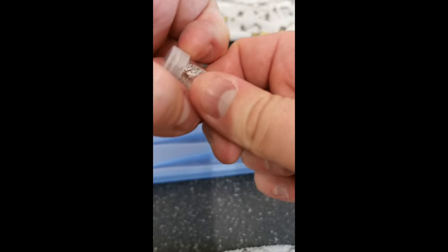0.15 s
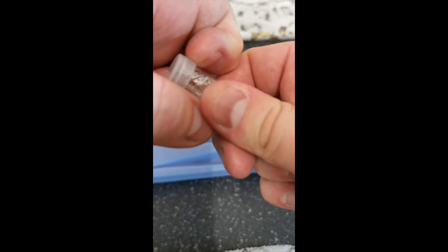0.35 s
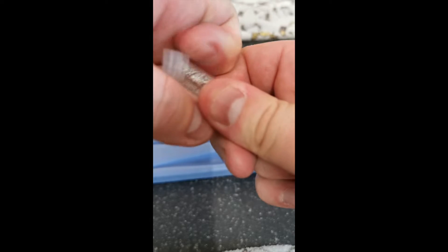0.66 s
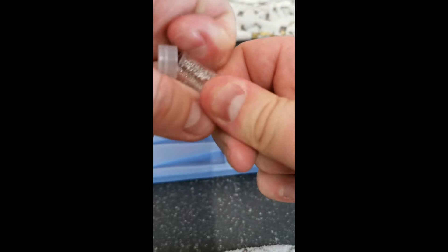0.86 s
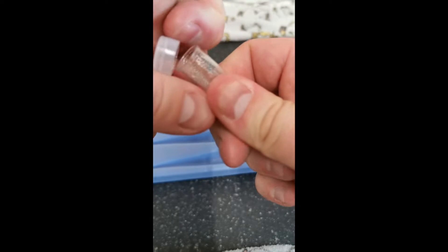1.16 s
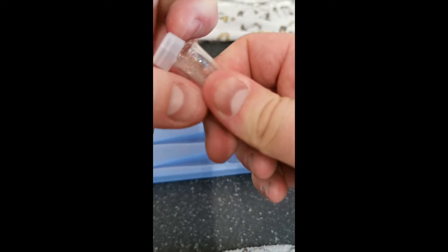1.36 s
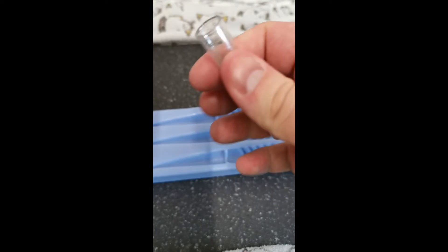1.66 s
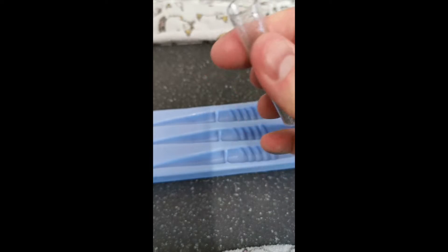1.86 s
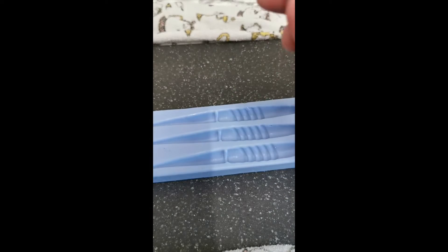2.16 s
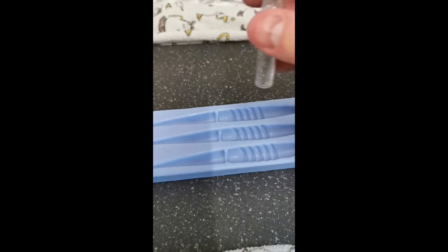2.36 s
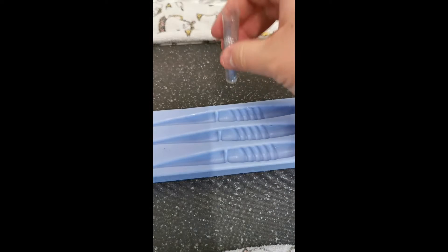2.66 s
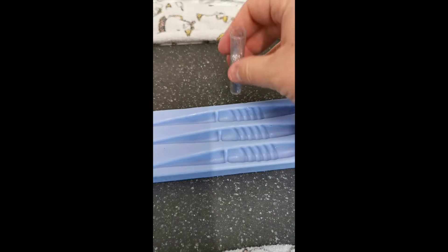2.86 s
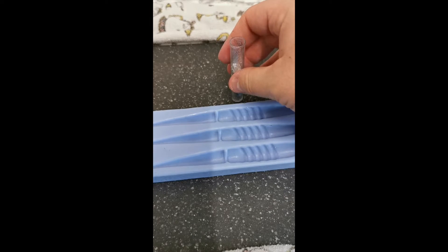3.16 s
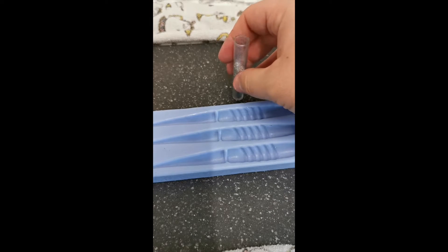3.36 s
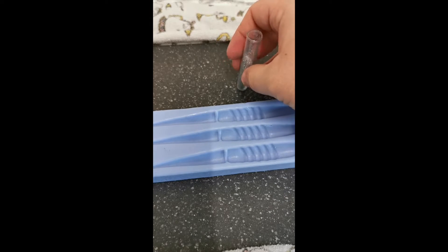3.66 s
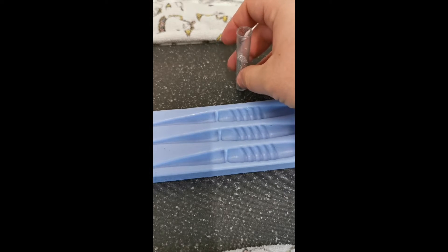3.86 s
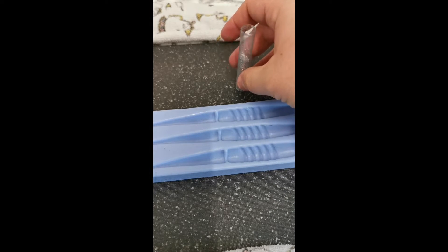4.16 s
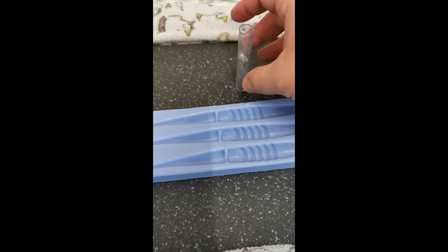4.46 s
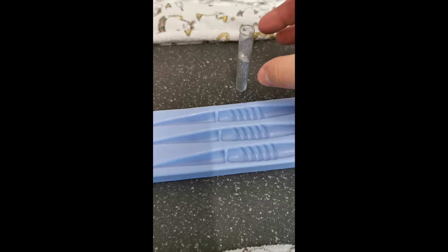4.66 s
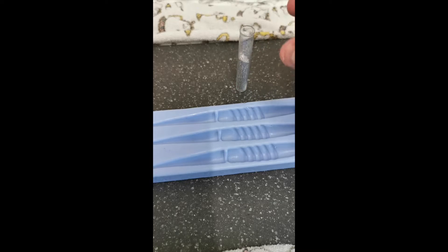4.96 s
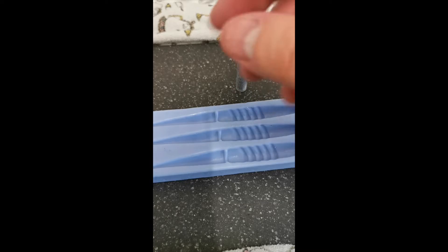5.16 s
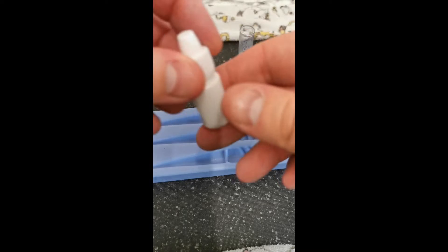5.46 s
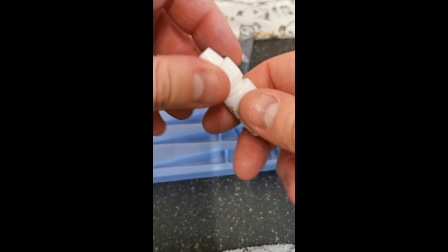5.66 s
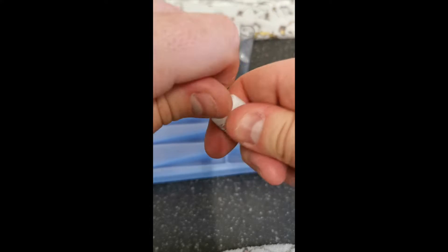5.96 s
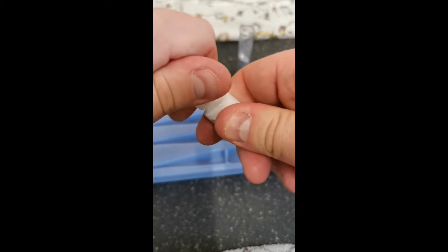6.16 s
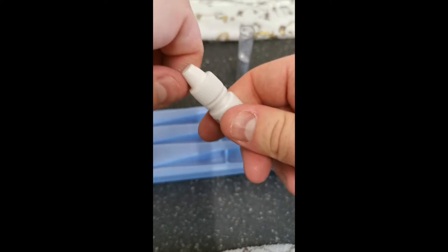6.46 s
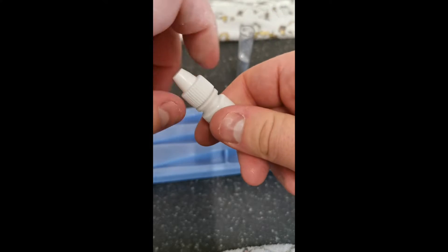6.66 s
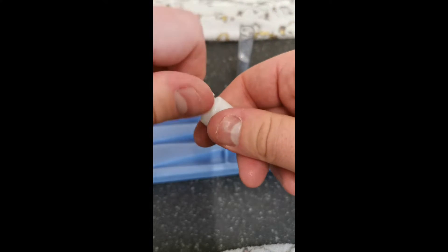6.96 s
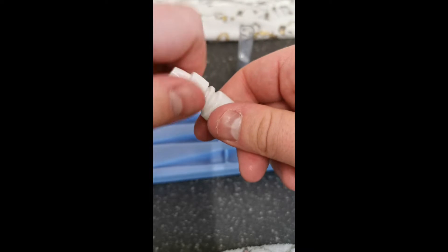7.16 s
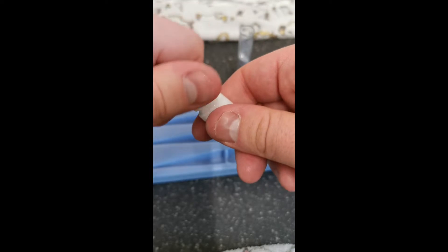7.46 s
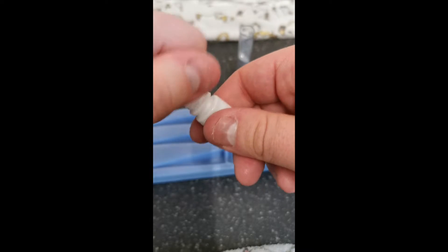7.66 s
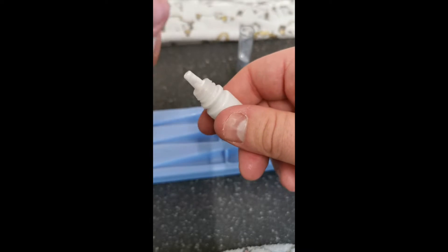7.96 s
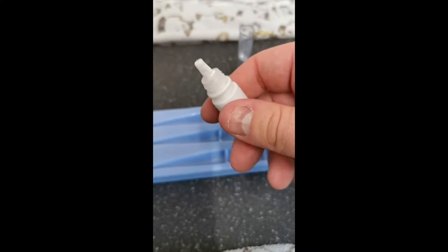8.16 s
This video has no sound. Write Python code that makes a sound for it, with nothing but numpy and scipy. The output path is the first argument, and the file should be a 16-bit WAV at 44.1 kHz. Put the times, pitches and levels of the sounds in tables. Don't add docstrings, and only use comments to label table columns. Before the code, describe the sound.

A microwave oven hums steadily in a small kitchen while fingers snap a hard plastic cap off a tube and twist a dropper cap with ticks and creaks.

```python
import sys
import numpy as np
from scipy import signal
from scipy.fft import rfft, irfft, next_fast_len
from scipy.io import wavfile
from scipy.ndimage import uniform_filter1d

SR = 44100
rng = np.random.default_rng(int(sys.argv[2]) if len(sys.argv) > 2 else 0)


def unload_audio(sound):
    columns = np.transpose(np.atleast_2d(sound))
    steps = np.round(np.clip(columns, -1, 1) * 32767)
    wavfile.write(sys.argv[1], SR, steps.astype(np.int16))


def natural_amplitude(level_db):
    exponent = np.asarray(level_db, float) / 20
    return 10 ** exponent


N = 366471

HARD_CRACK_HZ, SOFT_CRACK_HZ = [1500, 17000], [1600, 4100]


def on_log(hz, table, column):
    rows = np.array(table)
    return np.interp(np.log(np.maximum(hz, 1)), np.log(rows[:, 0]), rows[:, column])


def walk(rate):
    points = 16
    held = np.repeat(rng.standard_normal(int(N / SR * 30)), points)
    smooth = 1.2 * uniform_filter1d(uniform_filter1d(held, points), points)
    return np.interp(np.arange(N) * (points * rate / SR), np.arange(len(smooth)), smooth)


def bump(middle_s, half_s):
    return np.exp(-((np.arange(N) / SR - middle_s) / half_s) ** 2)


def tones(hz, table, sway_db, rate, sixth_db=0):
    out = 0
    turn = 2 * np.pi * hz * np.arange(N) / SR
    for multiple, left_db, right_db, lead in table:
        phase = round(multiple) * turn + 2 * np.pi * rng.random()
        drift_db = sway_db * walk(rate) + sixth_db * (round(multiple) == 6)
        sway = np.sqrt(2) * natural_amplitude(drift_db)
        left = natural_amplitude(left_db) * np.sin(phase + lead)
        right = natural_amplitude(right_db) * np.sin(phase)
        out = out + sway * np.array([left, right])
    return out


def transformer_buzz():
    # (multiple of mains, left level [dB], right level [dB], left lead [rad])
    buzz_partials = [(1, -71.5, -61.5, 0.16), (2, -70, -65, 0.32), (4, -57, -52.5, 0.63),
                     (5, -69.5, -64, 0.0072), (6, -61.5, -55.5, 0.38), (8, -68, -61, -.1),
                     (12, -75.5, -70.5, 0.25)]
    standing_db = 2.5 - 9 * bump(middle_s=5.37, half_s=1.28)
    return tones(49.97, buzz_partials, sway_db=0.8, rate=1.5, sixth_db=standing_db)


def fan_blades():
    # (multiple of blade rate, left level [dB], right level [dB], left lead [rad])
    blade_partials = [(1, -54.5, -51.5, -0.98), (2, -65, -57, -0.6), (3, -69.5, -74.5, 0.7),
                      (4, -78, -65.5, 0.9), (5, -76, -67.5, 4), (6, -62.5, -68.5, 3), (8, -78.5, -86, 5)]
    return tones(174.2, blade_partials, sway_db=1.5, rate=4.0)


def cooling_air():
    # (frequency [Hz], left level [dB per Hz], right level [dB per Hz], likeness [0-1], left lead [rad])
    rush = [(30, -85, -80, .7, -1), (74.3, -98.5, -89.5, 0.2, 1.3), (130.3, -85, -83, 1, 0),
            (229, -84.5, -84.5, .95, 0.17), (330.2, -84.5, -81, 1, -0.2), (490, -87, -88, 0.81, 0.76),
            (615, -89.5, -82, .2, .5), (900, -95, -83, .45, 2), (1155, -99.5, -92.5, 0.51, 3),
            (1555, -94.5, -101, .3, 3.5), (1850, -97, -88.5, .5, 6), (2300, -96, -100, .15, 8.5),
            (2650, -98.5, -94.5, 0.13, 3.5), (3200, -106, -103, 0, 11.5)]
    # (frequency [Hz], width [Hz], lift [dB])
    casing = [(123.7, 14.03, 10.5), (172.8, 24, 10.5), (330, 18, 6.5), (540, 60, 4)]
    # (frequency [Hz], left level [dB per Hz], right level [dB per Hz])
    hiss = [(3380, -106, -103), (4000, -108, -108), (4800, -109, -110), (6900, -119, -114),
            (7850, -116, -114), (8800, -108, -136), (9900, -112, -131), (10700, -109, -128),
            (12500, -114, -128), (14100, -118, -123), (15460, -113, -120), (15750, -113, -120),
            (15830, -150, -150)]
    size = next_fast_len(N)
    hz = np.fft.rfftfreq(size, 1 / SR)
    first, second = rfft(rng.standard_normal((2, size))) * np.sqrt(SR / 2)
    lift = natural_amplitude(sum(db / (1 + ((hz - f) / (width / 2)) ** 2) for f, width, db in casing))
    top_hz = rush[-1][0]

    def colour(column):
        level_db = np.where(hz < top_hz, on_log(hz, rush, column), on_log(hz, hiss, column))
        return natural_amplitude(level_db) * lift * np.minimum(hz / 25, 1)

    like = np.clip(on_log(hz, rush, 3), 0, 1) * np.minimum(top_hz / (hz + 1), 1) ** 2
    shared = like * first * np.exp(-1j * on_log(hz, rush, 4))
    mixed = shared + np.sqrt(1 - like ** 2) * second
    noise = irfft(np.array([colour(1) * first, colour(2) * mixed]), size)[:, :N]
    return noise * natural_amplitude(.5 * walk(3))


def skin_brush():
    # (middle [s], peak level [dB], half length [s])
    strokes = [
        (.0, -68.5, .1),
        (0.274, -62.5, 0.13),
        (2.75, -68, 0.088),
        (4.698, -78.5, 0.079),
        (5.2, -74, .5),
        (5.55, -70.5, .1),
        (6.399, -81, .6),
    ]
    # (start [s], length [s], from [Hz], to [Hz], level [dB])
    squeaks = [
        (4.66, .08, 10750, 10950, -79),
        (5.115, 0.042, 11050, 10500, -77),
        (7.245, .08, 11000, 11600, -77),
        (7.325, .05, 11600, 10400, -75),
    ]
    thin = signal.lfilter(*signal.butter(2, 10500, "high", fs=SR), rng.standard_normal(N))
    pressure = sum(natural_amplitude(db) * bump(s, half) for s, db, half in strokes)
    out = thin * natural_amplitude(2.2 * walk(24.8)) * pressure
    for s, length, from_hz, to_hz, db in squeaks:
        count = int(length * SR)
        glide = np.sin(2 * np.pi * np.cumsum(np.linspace(from_hz, to_hz, count)) / SR)
        out[int(s * SR):][:count] += natural_amplitude(db) * np.hanning(count) ** .2 * glide
    return out


def slips(table, crack_hz, crack_db, room_db, hollow):
    out = np.zeros((2, N + SR))
    grain = rng.standard_normal((len(table), 2048))
    t = np.arange(grain.shape[1]) / SR
    small = signal.butter(2, crack_hz, "band", fs=SR)
    for (s, ring_db, ring_hz, slip_ms), noise in zip(table, grain):
        burst = noise * np.abs(noise) * np.exp(-(t / (slip_ms / 1000)) ** 2)
        burst[0] = 1.8
        near = burst / np.sqrt(np.sum(burst ** 2))
        push = np.array([near, natural_amplitude(room_db) * (t == 0)])
        width_hz = 220 * (ring_hz / 1000) ** 1.25 / hollow
        peak = signal.iirpeak(ring_hz, ring_hz / width_hz, SR)
        ring = signal.lfilter(*peak, signal.lfilter(*peak, push))
        crack = natural_amplitude(crack_db) * signal.lfilter(*small, push)
        out[:, int(s * SR):][:, :len(t)] += natural_amplitude(ring_db) * (ring + crack)
    return out[:, :N]


def finger_catches():
    # (time [s], ring level [dB], ring pitch [Hz], slip length [ms])
    catches = [
        (.2240, -39.5, 10200, 18),
        (.406, -50, 10000, 4),
        (.537, -52, 9900, 4),
        (1.404, -49, 10000, 1),
        (2.716, -40.5, 13000, 17),
        (3.52, -49, 10000, 3),
        (3.658, -45, 12000, 1),
        (5.53, -45, 12500, 10),
    ]
    return slips(catches, HARD_CRACK_HZ, crack_db=5.5, room_db=-10, hollow=1.0)


def cap_snaps():
    # (time [s], ring level [dB], ring pitch [Hz], slip length [ms])
    rim_snaps = [
        (.7590, 5.5, 9900, .3),
        (.7608, -7, 11000, 2.2),
        (.943, 2.5, 12900, 0.9),
    ]
    return slips(rim_snaps, [3600, 17000], crack_db=-3, room_db=-15.5, hollow=0.88)


def tube_rings():
    # (time [s], ring level [dB], ring pitch [Hz], slip length [ms])
    tube_modes = [
        (.7592, 2, 4000, 1),
        (.7594, -2, 6700, .5),
        (.7598, -1, 2030, .64),
        (.9433, 0, 4300, 0.93),
        (.9431, 19, 1780, 0.2),
        (.9434, 10, 1310, .3),
    ]
    return slips(tube_modes, HARD_CRACK_HZ, crack_db=-39.5, room_db=-22, hollow=1.0)


def tube_touches():
    # (time [s], ring level [dB], ring pitch [Hz], slip length [ms])
    touches = [
        (.7600, -10, 2000, 2),
        (.9436, -1, 2800, 1),
        (3.005, -8, 900, 1.5),
        (3.005, -8, 1950, 2),
        (3.0943, -6, 5960, 2.1),
        (3.0945, -13, 3800, 2),
        (3.6590, -11, 2300, 3.7),
        (4.118, -19, 1900, 2),
    ]
    return slips(touches, HARD_CRACK_HZ, crack_db=-37, room_db=-8, hollow=.8)


def dropped_part():
    # (time [s], ring level [dB], ring pitch [Hz], slip length [ms])
    bounces = [
        (3.0878, -5, 10000, 3),
        (3.0941, 2.5, 9700, 3.4),
        (3.146, -21, 4940, 3),
        (3.180, -27, 5000, 2),
    ]
    return slips(bounces, HARD_CRACK_HZ, crack_db=-15, room_db=-4.5, hollow=1.2)


def worktop_knock():
    # (time [s], level [dB])
    blow = (3.6585, -30.5)
    # (frequency [Hz], level [dB], t60 [s])
    slab_modes = [(640, -10, .03), (800, 4.5, 0.021), (930, 1.5, 0.028), (1370, -9, .02),
                  (1800, -8.5, 0.016), (2520, -36, 0.018)]
    t = np.maximum(np.arange(N) / SR - blow[0], 0)
    modes = sum(natural_amplitude(db) * np.sin(2 * np.pi * hz * t) * natural_amplitude(-60 * t / t60) for hz, db, t60 in slab_modes)
    stiff = signal.butter(3, [480, 3600], "band", fs=SR, output="sos")
    return natural_amplitude(blow[1]) * signal.sosfilt(stiff, modes)


def dropper_ticks():
    # (time [s], ring level [dB], ring pitch [Hz], slip length [ms])
    teeth = [(5.992, -25.5, 11000, 7), (6.009, -29, 11000, 7.1), (6.0465, -18, 9500, 6.8),
             (6.0525, -6, 11300, 4.9), (6.077, -34, 12500, 1), (6.133, -25, 12500, 8),
             (6.1598, -4, 13000, 3.5), (6.1650, -3.5, 13000, 7.6), (6.503, -36, 11000, 3),
             (6.95, -40, 11100, 6), (7.7062, -13.5, 10700, 1.3), (7.7312, -24, 14500, .6),
             (7.7410, -18, 14000, 1), (7.7540, -21.5, 11000, 1.3), (7.8735, -25, 10600, .8),
             (7.8900, -13, 11000, 0.58), (8.29, -36, 9970, 5)]
    return slips(teeth, SOFT_CRACK_HZ, crack_db=-14, room_db=-17, hollow=1.5)


def shell_creaks():
    # (time [s], ring level [dB], ring pitch [Hz], slip length [ms])
    creaks = [
        (6.050, -9, 1900, 14),
        (6.163, -6, 2100, 20),
        (6.175, -13, 3030, 2.8),
        (7.680, -32.5, 6000, 2),
        (7.7065, -21, 3400, 1),
        (7.7545, -29, 4000, 1),
    ]
    return slips(creaks, SOFT_CRACK_HZ, crack_db=-3.5, room_db=-12, hollow=1.3)


def kitchen(feed):
    # (delay [s], level [dB])
    walls = [
        (.0098, -1),
        (0.0225, -4),
    ]
    tail_t60_s, tail_start_s = .36, 0.0023
    t = np.arange(SR // 2) / SR
    fade = natural_amplitude(-60 * t / tail_t60_s) * np.clip(t / tail_start_s - 1, 0, 1)
    tail = rng.standard_normal((2, len(t))) * fade
    tail *= natural_amplitude(3.0 * rng.standard_normal((2, len(t))))
    dull = signal.lfilter(*signal.butter(2, 12000, fs=SR), tail)
    tail = dull + (tail - dull) * natural_amplitude(-60 * t / 1.1)
    tail /= np.sqrt(np.sum(tail ** 2, axis=1, keepdims=True))
    for s, db in walls:
        tail[:, int(s * SR)] += natural_amplitude(db) / 3
    return signal.fftconvolve(feed[None], tail, axes=1)[:, :N]


def causal(db, size=1024):
    cep = irfft(np.log(natural_amplitude(db)), size)
    cep[1:size // 2] *= 2
    cep[size // 2 + 1:] = 0
    return irfft(np.exp(rfft(cep)), size)


def phone_ports(near, reflected):
    # (frequency [Hz], left gain [dB], right gain [dB])
    port_gains = [(1157, -1.5, -1.5), (1852, -5, 7.5), (2476, -1, -0.5), (4000, 1.5, 0.5), (7200, 0, 1.5),
                  (7960, -2.5, -0.5), (8896, 10.5, -26.5), (9900, 2, -33), (10900, 8, -25.5),
                  (11300, 0.5, -32), (13000, 1, -24), (15700, -8.5, -22), (16950, -39, -60.5)]
    shadow_hz, shadow_db, right_lag_s = 2700, -18.5, 0.00029
    hz = np.fft.rfftfreq(1024, 1 / SR)
    shade = causal(shadow_db / (1 + (shadow_hz / (hz + 1)) ** 4))
    behind = np.roll(signal.fftconvolve(near, shade)[:N], int(right_lag_s * SR))
    arrive = np.array([near, behind]) + reflected
    ports = np.array([causal(on_log(hz, port_gains, c)) for c in (1, 2)])
    return signal.fftconvolve(arrive, ports, axes=1)[:, :N]


def gain_db():
    duck_s, hold_s, recover_s = 0.757, 0.18, .12
    before_db, duck_db, sag_db_per_s = 1.66, -3.5, -0.063
    since = np.arange(N) / SR - duck_s
    after = duck_db * np.exp(-np.maximum(since - hold_s, 0) / recover_s) + sag_db_per_s * since
    return uniform_filter1d(np.where(since < 0, before_db, after), size=256)


def scene():
    oven = transformer_buzz() + fan_blades() + cooling_air()
    cap_and_tube = finger_catches() + cap_snaps() + tube_rings() + tube_touches()
    near, feed = cap_and_tube + dropped_part() + dropper_ticks() + shell_creaks()
    blow = worktop_knock()
    near = near + blow + skin_brush()
    feed = feed + natural_amplitude(-3) * blow
    return phone_ports(near, kitchen(feed)) + oven


def low_pass(x):
    return signal.sosfilt(signal.butter(12, 16840, fs=SR, output="sos"), x)


def record(dry):
    mix = dry * natural_amplitude(gain_db())
    return low_pass(mix)


dry = scene()
out = record(dry)
unload_audio(out)
```